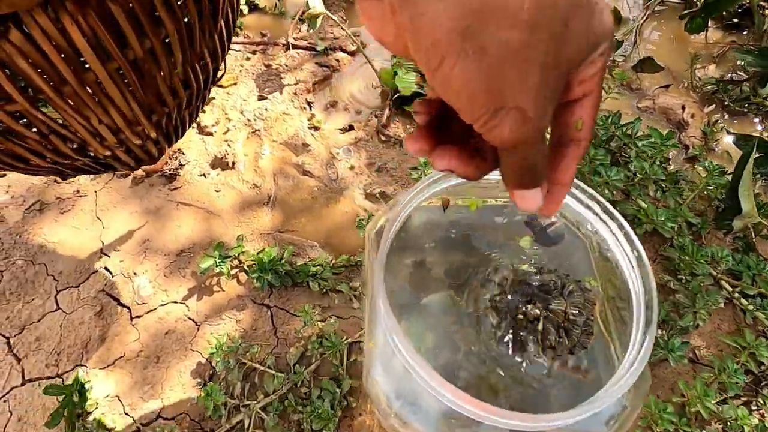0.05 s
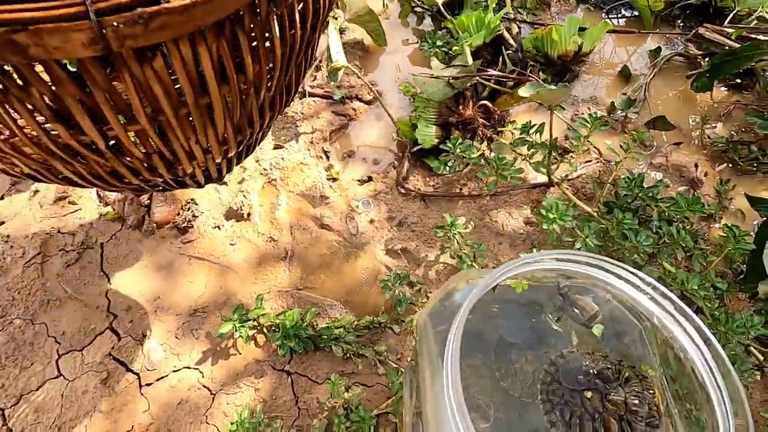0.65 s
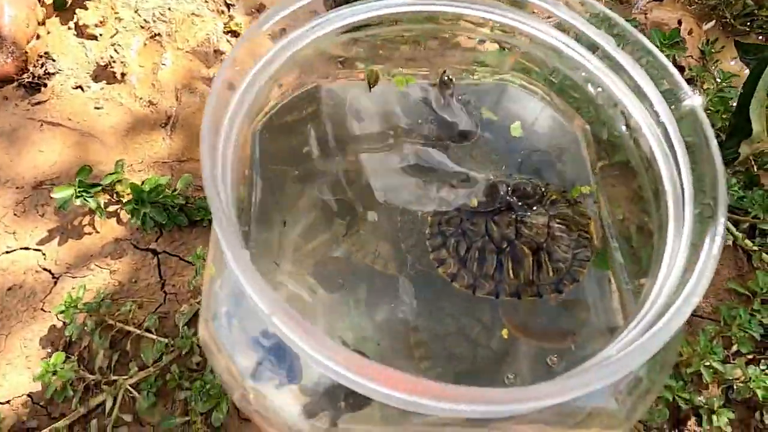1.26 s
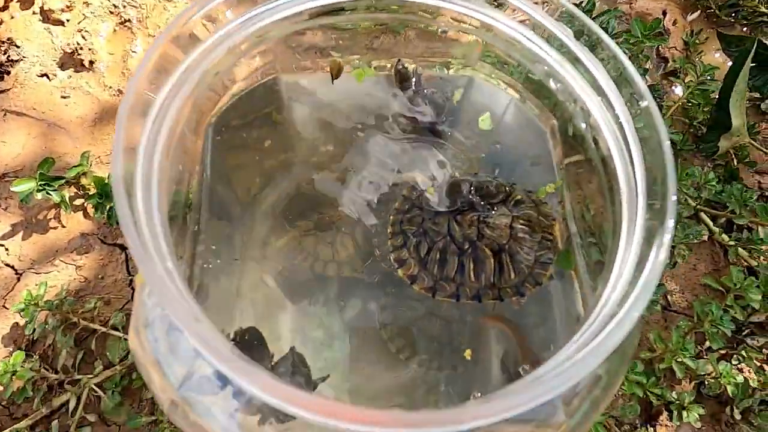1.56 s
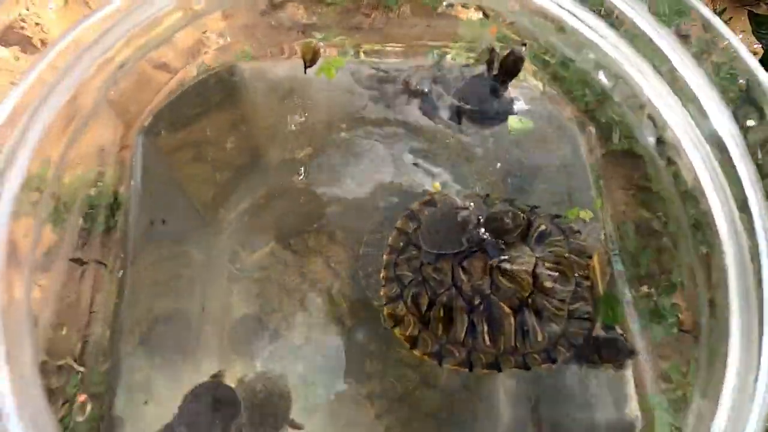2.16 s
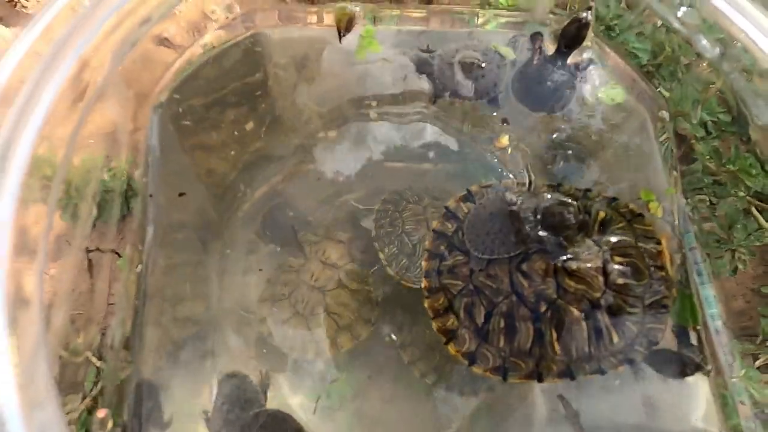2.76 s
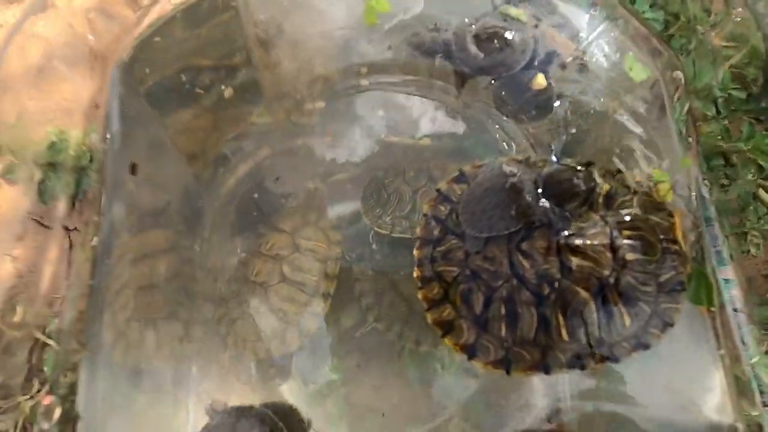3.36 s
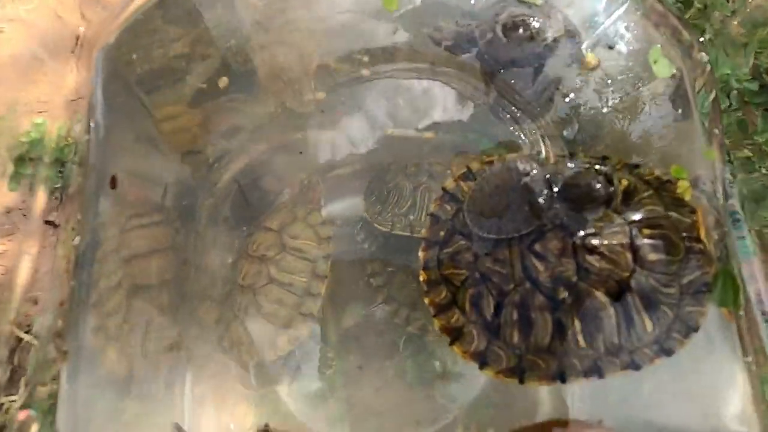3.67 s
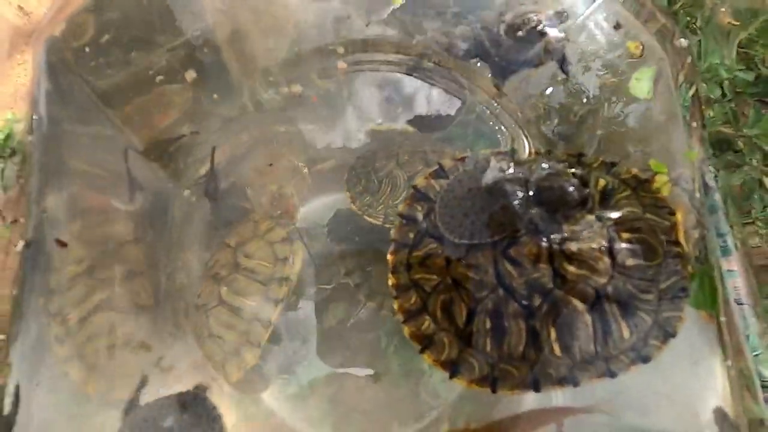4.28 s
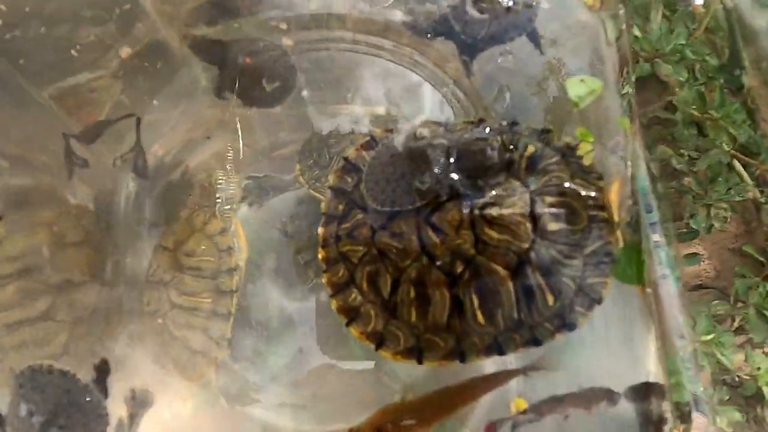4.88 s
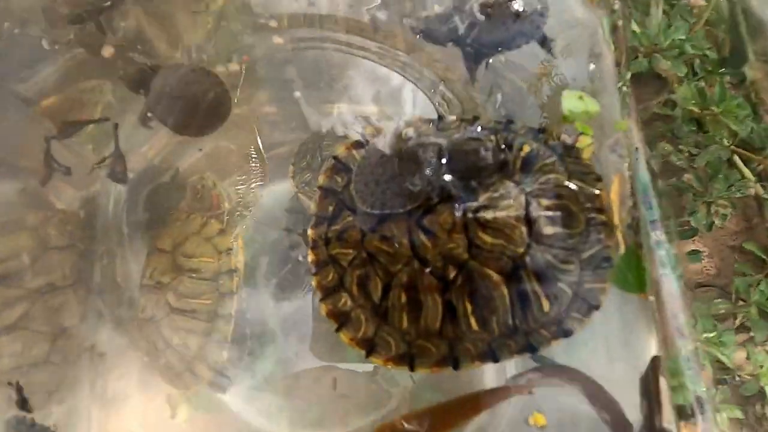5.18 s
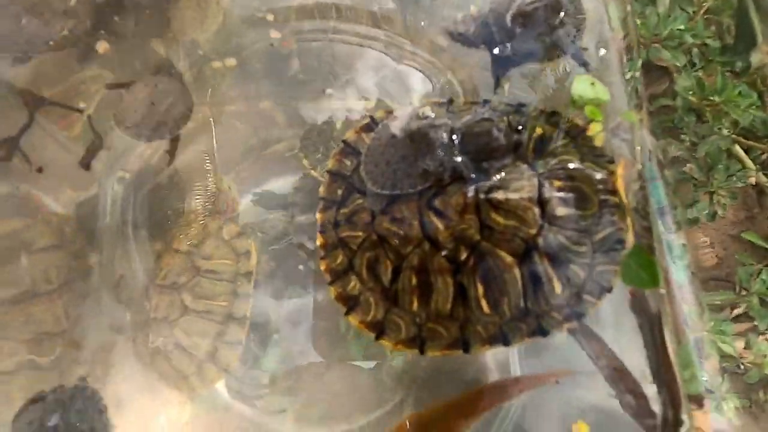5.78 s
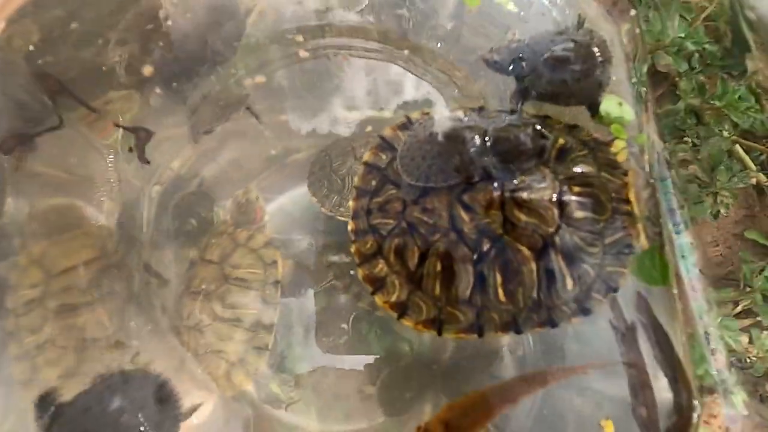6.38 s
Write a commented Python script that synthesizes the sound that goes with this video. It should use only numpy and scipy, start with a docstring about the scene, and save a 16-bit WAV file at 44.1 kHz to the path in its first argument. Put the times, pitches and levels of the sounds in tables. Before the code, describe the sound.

A plastic tub of water with small turtles in it is heard close up outdoors, over a faint hush and light wind on the microphone. In the first 1.3 seconds there are several soft thuds on the ground, with a sharp plastic snap at 0.7. A hand brushes faintly past until about 2 seconds. Shells knock hollowly and scrape against the tub at irregular intervals throughout, softly at first, with a stronger bump at 2.6 and a loud snap at 2.9. From there to 3.6 come small splashes, fine bubbling and bright, sharp ticks. Around 4.2 there is a plop and another little splash among more knocks, while the wind rumble swells slightly. Tiny squeaks and drips follow between 5.1 and 5.4. From 5.6 to the end at 6.5, a short scrape, more bumps and crisp ticks sound.

```python
"""Small turtles bump and scrape their shells against a plastic tub of water on the ground outdoors.
Each impact excites the damped modes of wall, sides and floor; paddling flicks up splashes and traps air,
which rings as bubbles. Drips, plops and short squeaks glide in pitch. Plastic snaps and ticks, the ground
thuds, and a hand rubs the rim and rustles close by. Turbulence of a light wind rumbles on the
microphone ports over a faint hush."""
import sys
import numpy as np
from scipy import signal
from scipy.fft import rfft, irfft, next_fast_len
from scipy.io import wavfile
from scipy.ndimage import uniform_filter1d, map_coordinates

SR = 44100
rng = np.random.default_rng(int(sys.argv[2]) if len(sys.argv) > 2 else 0)


def unload_wav(signal):
    """Save mono or channel-first audio to the path in sys.argv[1] as 16-bit WAV at rate SR, clipped to [-1, 1]."""
    wavfile.write(
        sys.argv[1],
        SR,
        np.round(np.clip(np.atleast_2d(signal).T, -1, 1) * 32767).astype(np.int16),
    )


N = 287973

# modes of the water-loaded tub: f/Hz, level/dB, T60/s
TUB_MODES = [(210.2, -7.5, 0.18), (240, -6.5, 0.097), (308.6, -6, 0.098), (452.5, -4.5, 0.12),
             (511, -5.5, 0.12), (571.4, -1.5, 0.1), (628, -0.5, 0.071), (697.8, 3, 0.058), (757, -1, 0.06),
             (883, -15.5, 0.026), (1487, 2, 0.045), (1537, -4, 0.014), (2530, -13, 0.017),
             (2830, -8.5, 0.026), (3850, -15.5, 0.019)]
# excitation of the tub by claws and moving water: t/s, level/dB
STIR_LEVEL = [(0.0, -45.5), (0.24, -66.5), (1.03, -69.5), (2.29, -68), (2.73, -54.5), (3.35, -58.5),
              (4.11, -47.5), (5.07, -53.5), (5.64, -58.5), (5.82, -49.5), (6.53, -51.5)]
# flicks of water: t/s, duration/s, rms level/dB
FLICKS = [(2.871, 0.035, -44), (2.967, 0.058, -49), (3.331, 0.03, -34.5), (3.362, 0.042, -38),
          (3.446, 0.024, -41.5), (3.471, .03, -34), (4.162, 0.017, -51), (4.208, 0.032, -41),
          (4.244, 0.068, -48), (5.998, 0.062, -51.5)]
# spectra of low rumble, fine crackle and spray: f/Hz, level/dB
RUMBLE_SPECTRUM = [(40, -0.5), (80, 1.5), (125, 1.5), (160, -4.5), (220, -17.5), (400, -32), (900, -60)]
CRACKLE_SPECTRUM = [(500, -50), (1000, -2), (1800, -1.5), (3100, -1.5), (4500, -2.5), (6500, -4.5),
                    (8200, -10.5), (10000, -11), (13500, -32), (15500, -43)]
SPRAY_SPECTRUM = [(400, -8), (800, -14), (1660, 1.5), (2400, -2.5), (3400, 0), (4800, -0.5), (6500, -1.5),
                  (8000, -12), (10000, -14), (13000, -27), (15500, -46)]


def amp(db):
    """Amplitude ratio of a level in decibels."""
    return 10 ** (np.asarray(db) / 20)


def unit(x):
    """Normalisation to rms 1."""
    return x / np.sqrt(np.mean(x ** 2) + 1e-20)


def peaked(x):
    """Normalisation to peak 1."""
    return x / (np.abs(x).max() + 1e-12)


def seconds(length):
    """Uniformly sampled time axis."""
    return np.arange(int(length * SR)) / SR


def curve(points):
    """Linear interpolation of (t/s, value) points over the scene."""
    return np.interp(np.arange(N) / SR, *np.transpose(points))


def wobble(rate):
    """Smooth random modulation: a spline through rate Gaussian knots a second."""
    return map_coordinates(rng.standard_normal(int(N * rate / SR) + 4), [np.arange(N) * rate / SR])


def chance(per_s):
    """Poisson process: sample positions of events at a steady or changing rate."""
    return np.flatnonzero(rng.random(N) < per_s / SR)


def filtered(x, response):
    """Linear filtering: the spectrum of x times a frequency response."""
    n = x.shape[-1]
    m = next_fast_len(2 * n)
    return irfft(rfft(x, m) * response(np.fft.rfftfreq(m, 1 / SR)), m)[..., :n]


def coloured(x, points):
    """Spectral shaping by (f/Hz, level/dB) points, to rms 1."""
    f, db = np.transpose(points)
    return unit(filtered(x, lambda hz: amp(np.interp(np.log(hz + 1), np.log(f), db))))


def patchy(x, depth_db):
    """Time-frequency modulation: every few milliseconds other narrow bands stand out."""
    spectra = signal.stft(x, nperseg=256)[2]
    field = uniform_filter1d(rng.standard_normal(spectra.shape[-2:]), 5, axis=0)
    field = uniform_filter1d(field, 2, axis=1)
    return signal.istft(spectra * amp(depth_db * unit(field)), nperseg=256)[1][..., :x.shape[-1]]


def pair(n, correlation):
    """Partially coherent white noise at two microphones."""
    common, opposed = rng.standard_normal((2, n))
    angle = np.arccos(np.clip(correlation, -1, 1)) / 2
    return np.cos(angle) * common + np.sin(angle) * np.array([opposed, -opposed])


def placed(x, left_db, lag_ms):
    """Direction cues: level difference and delay of the left microphone against the right."""
    side = np.array([[.5], [-.5]])
    return filtered(x, lambda hz: amp(side * left_db) * np.exp(-2j * np.pi * hz * side * lag_ms / 1000))


def add(track, s, sound):
    """Superposition of a sound on the track from time s."""
    part = track[..., max(round(s * SR), 0):][..., :sound.shape[-1]]
    part += sound[..., :part.shape[-1]]


def ring(modes, t, rise_cycles, scatter_db, detune):
    """Damped free vibration, a row per mode; each blow lands elsewhere, and low modes build slowly."""
    hz, db, t60 = np.transpose(modes)[:, :, None]
    size, pitch, phase = rng.standard_normal((3, len(modes), 1))
    swell = 1 - np.exp(-t * hz / rise_cycles)
    tone = np.sin(2 * np.pi * (hz * (1 + detune * pitch) * t + phase))
    return amp(db + scatter_db * size - 60 * t / t60) * swell * tone


def wind():
    """Turbulent pressure buffets each port unevenly; a rumble weakly follows it, over a steady hush."""
    # wind strength: t/s, level/dB
    strength = [(0, -48), (.33, -44.5), (.8, -57), (1.14, -42.5), (1.45, -54.5), (2.2, -49.5), (2.7, -43.5),
                (3.45, -37.5), (3.6, -32.5), (3.92, -37), (4.1, -33.5), (4.33, -45.5), (4.46, -34.5),
                (4.66, -32), (4.98, -65), (5.75, -52), (6.15, -38), (6.43, -41), (6.53, -80)]
    # spectra of the eddies and of the outdoor hush: f/Hz, level/dB
    eddy_spectrum = [(11, -19), (18, -15), (44, 0), (110, -21.5), (140, -53), (240, -120)]
    hush_spectrum = [(100, -42), (170, 0.5), (348, -9), (675, -4), (948, -22), (1490, -10.5), (1940, -27.5),
                     (3000, -22.5), (8470, -34.5), (12100, -51), (15500, -64)]
    strength_db = curve(strength)
    eddies, gusts = pair(N, correlation=.05), pair(N, correlation=.62)
    buffet = amp(strength_db + 2 * wobble(15)) * coloured(eddies, eddy_spectrum)
    rumble_db = -44 + .22 * (strength_db - strength_db.mean()) + 1.84 * wobble(15)
    rumble = amp(rumble_db) * coloured(gusts, RUMBLE_SPECTRUM)
    hush = amp(-59.5) * coloured(pair(N, correlation=.75), hush_spectrum)
    return buffet + rumble + hush


def ground_thuds():
    """Heavily damped impacts on dry ground: a short boom, a low push of air and a scuff of dust."""
    # soft blows: t/s, level/dB
    blows = [(0.312, -31), (0.707, -22.5), (0.894, -31.5), (1.096, -32.5), (1.126, -33), (1.212, -41),
             (1.272, -35), (5.662, -34)]
    # modes of the ground: f/Hz, level/dB, T60/s
    ground_modes = [(180.4, 10, 0.054), (234, 8, 0.088), (293, -1, 0.016), (398, -1, 0.046),
                    (880, -19, 0.0052)]
    # spectrum of scuffed dust: f/Hz, level/dB
    dust_spectrum = [(100, 9), (300, 2), (1000, -1.5), (4000, -36)]
    out, t = np.zeros(N), seconds(.2)
    for s, db in blows:
        boom = peaked(ring(ground_modes, t, rise_cycles=1, scatter_db=4.5, detune=.037).sum(0))
        push = peaked(np.sin(2 * np.pi * 105 * t) * amp(-60 * t / .036))
        scuff = peaked(coloured(rng.standard_normal(len(t)), dust_spectrum) * amp(-60 * t / .061))
        add(out, s, amp(db - 4) * (boom + amp(-2.5) * push + amp(-5) * scuff))
    return placed(out, left_db=-6, lag_ms=.059)


def sliding_hand():
    """Friction noise: skin brushes past the microphone with a bright, grainy hiss."""
    # course of the stroke: t/s, level/dB
    stroke = [(1.238, -100), (1.247, -48), (1.28, -65.5), (1.42, -66.5), (1.55, -58), (1.65, -62),
              (1.76, -58), (1.88, -70), (2.0, -100)]
    # spectrum of rubbing skin: f/Hz, level/dB
    skin_spectrum = [(1500, -8.5), (3500, -4.5), (6000, -4.5), (8200, -11.5), (10000, -12.5), (13500, -24),
                     (15500, -31)]
    friction = pair(N, correlation=.17) * amp(1.8 * wobble(710) + 3.3 * wobble(50.6))
    return amp(curve(stroke)) * coloured(friction, skin_spectrum)


def rim_rub():
    """Friction-excited vibration: fingers slip off the rim at the start, and it sings faintly."""
    out, t = np.zeros(N), seconds(.19)
    hz = 950 * (1 + .0097 * wobble(82)[:len(t)])
    tone = unit(np.sin(2 * np.pi * np.cumsum(hz) / SR))
    rub = coloured(rng.standard_normal(len(t)), [(250, -3), (550, 5), (900, -6), (1500, -30), (5000, -51)])
    add(out, 0, signal.windows.tukey(len(t), .4) * (amp(-64) * tone + amp(-55.5) * rub))
    return out


def water_unrest():
    """Agitation of the water in dB: paddling and the wash after each flick add in power."""
    # vigour of the paddling: t/s, level/dB
    paddling = [(0.0, -64.5), (1.03, -72.5), (1.6, -62), (2.64, -71.5), (2.87, -67), (3.02, -60),
                (3.31, -57), (3.51, -49.5), (3.76, -66), (4.0, -66), (4.22, -55), (4.44, -63.5),
                (4.65, -67), (5.12, -68), (5.25, -60.5), (5.87, -60.5), (6.53, -65.5)]
    wash_db, rise_s, t60_s = -16.5, .017, .49
    power, t = amp(curve(paddling)) ** 2, seconds(1)
    for s, _, db in FLICKS:
        wash = amp(db + wash_db - 60 * t / t60_s) * (1 - np.exp(-t / rise_s))
        add(power, s, wash ** 2)
    return 10 * np.log10(power)


def spatter(per_s, t60_s, bed_db):
    """Shot-noise envelope: tiny decaying impacts of uneven size over a weak bed."""
    hits = (rng.random(N) < per_s / SR) * amp(-14 * rng.random(N))
    return signal.fftconvolve(hits, amp(-60 * seconds(.03) / t60_s))[:N] + amp(bed_db)


def wet_crackle(unrest_db):
    """Granular noise of scratching claws and lapping water, each speck in its own narrow bands."""
    grain = spatter(per_s=170, t60_s=.018, bed_db=-12) * amp(2 * wobble(30))
    specks = patchy(pair(N, correlation=.3) * grain, depth_db=4.5)
    return placed(amp(unrest_db + 1) * coloured(specks, CRACKLE_SPECTRUM), left_db=2, lag_ms=.052)


def bubble(hz, cycles):
    """Volume resonance of an air pocket: it decays by 1/e in the given cycles, rising a little in pitch."""
    age = seconds(7 * cycles / hz) * hz / cycles
    envelope = (1 - np.exp(-3 * age)) * np.exp(-age)
    return envelope * np.sin(2 * np.pi * cycles * (age + .006 * age ** 2))


def froth(unrest_db):
    """Air entrainment: stirred water releases small bubbles, more and louder as agitation grows."""
    brisk_db, brisk_per_s, doubling_db, most_per_s = -60, 110, 3.5, 400
    out = np.zeros((2, N))
    starts = chance(np.minimum(brisk_per_s * 2 ** ((unrest_db - brisk_db) / doubling_db), most_per_s))
    for i, (pitch, size, life, side) in zip(starts, rng.standard_normal((len(starts), 4))):
        hz = np.clip(3300 * np.exp(.45 * pitch), 1100, 9000)
        pan_db = np.array([[1.5], [-1.5]]) * side
        gain = amp(unrest_db[i] + 4.5 + 4 * min(size, 2) + pan_db)
        add(out, i / SR, gain * bubble(hz, cycles=7.5 * np.exp(.45 * life)))
    return placed(out, left_db=16, lag_ms=.054)


def drips_and_squeaks():
    """Frequency glides: drips, plops and short squeaks are brief gliding tones with a little hiss."""
    # drips, plops and short squeaks: t/s, level/dB, f/Hz, glide/(octaves per s)
    chirps = [(0.332, -40, 1650, -16.5), (2.889, -29.5, 4160, -4), (3.038, -47, 6370, 72),
              (3.645, -39, 2960, 17), (3.738, -41.5, 6590, 9), (4.175, -25, 605, 2.5),
              (4.325, -41.5, 3750, 8.5), (5.14, -38, 3250, 8.5), (5.189, -36, 2156, -7),
              (5.248, -45, 4230, 9), (5.263, -44.5, 2240, -5), (5.353, -37.5, 4370, -16.5),
              (5.392, -37, 2840, -1), (5.409, -28, 2940, -1.5), (5.406, -27.5, 1515, 1),
              (5.417, -36.5, 1010, -20.5)]
    out, t = np.zeros(N), seconds(.059)
    for s, db, hz, glide in chirps:
        swell_s = .0079 * (1000 / hz) ** .34  # higher tones are quicker
        envelope = peaked(t ** 2 * np.exp(-2 * t / swell_s))
        tone = np.sin(2 * np.pi * np.cumsum(hz * 2 ** np.clip(glide * t, -1, 1)) / SR)
        band = [(hz / 3, -25), (hz, 0), (hz * 1.42, -16), (hz * 7, -55)]
        hiss = coloured(rng.standard_normal(len(t)), band)
        add(out, s, amp(db) * envelope * (.41 * tone + .46 * hiss))
    return placed(out, left_db=3.5, lag_ms=.026)


def splashes():
    """Surface break-up: a flicking foot tears the water into spurts, each at its own pitch, over mist."""
    spurts_per_s, t60_s, low_hz, high_hz = 190, .024, 1700, 10000
    out, t = np.zeros((2, N)), seconds(.017)
    for s, length, db in FLICKS:
        progress = seconds(length) / length
        spurts = np.zeros((2, len(progress)))
        count = int(length * spurts_per_s) + 1
        for k, (delay, pitch, size) in enumerate(rng.random((count, 3))):
            hz = low_hz * (high_hz / low_hz) ** pitch
            spurt = coloured(pair(len(t), correlation=.5), [(hz / 2, -16), (hz, 0), (hz * 2, -16)])
            add(spurts, (k + delay / 2) / count * length, amp(-10 * size - 60 * t / t60_s) * spurt)
        mist = amp(-2.5) * pair(len(progress), correlation=.28)
        spray = coloured(unit(spurts) + mist, SPRAY_SPECTRUM)
        add(out, s, amp(db) * unit(progress ** .34 * (1 - progress) * spray))
    return placed(out, left_db=6.5, lag_ms=.039)


def ticks(unrest_db):
    """Light impacts of claws and drops on plastic: noise bursts, each with a resonance and a weak tail."""
    # strikes: t/s, peak level/dB, resonance f/Hz, treble boost/dB
    strikes = [(0.042, -43, 3000, -6), (.111, -40, 2700, -11), (0.1384, -33.5, 2970, -2),
               (0.9553, -47, 2940, -2), (1.0864, -41, 3020, -14), (1.527, -33, 5600, 6),
               (1.59, -35.5, 4300, 10), (1.721, -31.5, 2630, -3), (2.079, -38.5, 4200, -13),
               (2.2329, -36.5, 4600, -1), (2.4145, -33.5, 3020, -3), (2.5605, -32.5, 2060, -13),
               (2.5814, -26, 2840, -6), (2.9828, -16, 4500, 15), (3.091, -31.5, 4170, 20),
               (3.111, -25, 3550, -3), (3.249, -23.5, 3420, -12), (3.3346, -16, 5600, -7),
               (3.341, -25, 3660, 1), (3.378, -24.5, 5470, 32), (3.452, -20.5, 2970, 12),
               (3.4592, -16.5, 3914, 0), (3.4642, -11, 4000, 8), (3.477, -19, 4100, -2),
               (3.4825, -16, 2840, 6), (3.5669, -12, 3300, 6), (3.6293, -25.5, 2080, -12),
               (4.067, -28.5, 1890, -9), (4.2035, -26, 4810, 6), (4.215, -28, 4270, 18),
               (4.261, -24, 2270, -29), (4.329, -25, 3840, 8), (4.4917, -35, 3020, -9),
               (5.638, -30.5, 3960, 0.5), (5.7381, -19, 6170, 0), (5.9792, -13.5, 3830, 7),
               (5.999, -29, 3870, 3), (6.029, -29, 3340, 6), (6.157, -26, 4570, -5),
               (6.176, -30.5, 4500, 19), (6.233, -26, 2720, 12), (6.2606, -34, 4280, 6),
               (6.2892, -31.5, 4660, 21)]
    rise_s, t60_s, tail_db, tail_t60_s, half_width_hz = .00072, .015, -27, .26, 360
    out, t = np.zeros((2, N)), seconds(.041)
    envelope = (1 - np.exp(-t / rise_s)) * (amp(-60 * t / t60_s) + amp(tail_db - 60 * t / tail_t60_s))
    faint = [(i / SR, unrest_db[i] + 19.5 + rng.uniform(-5, 5), 3000 * rng.lognormal(0, .2), 0)
             for i in chance(per_s=8)]
    for s, db, centre_hz, treble_db in strikes + faint:
        noise = coloured(patchy(pair(len(t), correlation=.18), depth_db=3.5), SPRAY_SPECTRUM)
        resonance = lambda hz: 1 + 2.9 / (1 + ((hz - centre_hz) / half_width_hz) ** 2)
        shelf = lambda hz: amp(treble_db / (1 + (6000 / (hz + 1)) ** 4))
        tick = filtered(noise, lambda hz: resonance(hz) * shelf(hz))
        add(out, s, amp(db) * peaked(tick * envelope))
    return placed(out, left_db=3.5, lag_ms=.043)


def snaps():
    """Sudden release of strain in stiff plastic: an impulse, a short ring and a rustle as it settles."""
    # snaps: t/s, level/dB, upper modes/dB, damping by the grip/(dB per s), crack re ring/dB
    releases = [(0.6764, -11, -11, 700, 5), (2.9068, -8, 3, 300, -12), (6.337, -26, -13.5, 60, 7)]
    # modes of the stiff plastic: f/Hz, level/dB, T60/s
    plastic_modes = [(645, 1, 0.017), (1220, 7, 0.023), (1450, 2.5, 0.032), (1960, 8, 0.011),
                     (3080, 1.5, 0.02), (3650, 7, 0.02), (4490, 10.5, 0.0023)]
    # two bands of the impulse: lower f/Hz, upper f/Hz
    crack_bands = [(1080, 1720), (2700, 4900)]
    out, t = np.zeros(N), seconds(.06)
    upper = np.transpose(plastic_modes)[0] > 2500
    bandpasses = [signal.butter(3, band, "bandpass", fs=SR, output="sos") for band in crack_bands]
    low, high = [signal.sosfilt(sos, signal.unit_impulse(len(t))) for sos in bandpasses]
    crack = peaked(1.8 * low + high)
    for s, db, upper_db, damping, crack_db in releases:
        modes = ring(plastic_modes, t, rise_cycles=.3, scatter_db=1, detune=.01)
        body = peaked(modes[~upper].sum(0) + amp(upper_db) * modes[upper].sum(0)) * amp(-damping * t)
        rustle = coloured(rng.standard_normal(len(t)), CRACKLE_SPECTRUM) * amp(-24 - 60 * t / .062)
        add(out, s, amp(db) * (peaked(body + amp(crack_db) * crack) + rustle))
    return placed(filtered(out, lambda hz: 1 / (1 + (hz / 8500) ** 4)), left_db=7, lag_ms=.061)


def sloshing(x, depth, per_s):
    """Frequency modulation: sloshing water shifts all resonances by a share of about depth."""
    return map_coordinates(x, [np.arange(N) + depth * SR / per_s * wobble(per_s)], mode="reflect")


def stirring():
    """Forced vibration: claws and moving water keep the tub's modes faintly ringing between bumps."""
    hz, db, t60 = np.transpose(TUB_MODES)
    widths = 1.96 * np.log(1000) / np.pi / t60  # about twice the bandwidth of free decay
    gains = amp(db - 12 * np.maximum(np.log2(hz / 800), 0))
    gains[1::2] *= -1  # neighbouring modes alternate in sign
    body = lambda f: sum(gain * 1j * f * width / (centre ** 2 - f ** 2 + 1j * f * width)
                         for centre, width, gain in zip(hz, widths, gains))
    scratches = pair(N, correlation=1) * amp(9.2 * wobble(45))
    ringing = np.array([sloshing(channel, depth=.05, per_s=7) for channel in filtered(scratches, body)])
    return placed(amp(curve(STIR_LEVEL)) * unit(ringing), left_db=-5.5, lag_ms=.061)


def shell_scrapes():
    """Stick-slip friction: a shell drags along the wet plastic."""
    # drags: t/s, duration/s, level/dB
    drags = [(1.068, 0.065, -56.5), (1.721, 0.066, -52), (2.35, 0.11, -53), (3.099, 0.1, -47),
             (4.049, .25, -44), (4.769, 0.14, -47.5), (5.229, 0.15, -48), (5.727, 0.16, -37),
             (6.015, 0.12, -45.5), (6.319, 0.033, -42)]
    # spectrum of shell on plastic: f/Hz, level/dB
    scrape_spectrum = [(200, 3.5), (420, 5.5), (740, 9.5), (950, -41), (1500, -20), (2400, -10.5),
                       (4000, -24.5), (9000, -39.5)]
    out = np.zeros(N)
    for s, length, db in drags:
        n = len(seconds(length))
        slips = rng.standard_normal(n) * amp(4.5 * wobble(169)[:n])
        scrape = coloured(patchy(slips, depth_db=4), scrape_spectrum)
        add(out, s, amp(db) * signal.windows.tukey(n, .5) * scrape)
    return placed(out, left_db=-2.5, lag_ms=.031)


def shell_bumps():
    """Modal response to shell impacts: the wall ticks, the loaded sides ring hollow, the floor booms."""
    # blows: t/s, peak level of the sides/dB, floor and wall re sides/dB, favoured f/Hz, chatter (0-1)
    blows = [(.111, -37, -32, -14, 647, .34), (.787, -44, -23, -5.5, 750, 0.31),
             (1.06, -38, -31, -6.5, 716, 0.58), (1.27, -42, -4, 1.5, 660, 0.3),
             (1.394, -37.5, -6, -8, 624, 0.44), (1.531, -39, -9, -5, 580, 0.78),
             (1.582, -44, 2.5, -8, 605, 0.81), (1.721, -36, -24, -7, 676, 0.62),
             (2.186, -32.5, -7.5, -6.5, 630, 0.54), (2.281, -34.5, -14, -11, 700, 0.5),
             (2.366, -35.5, -9.5, -11, 720, 0.97), (2.583, -18.5, -10.5, -11.5, 610, 0.33),
             (2.699, -38.5, 1, -9.5, 700, 0.67), (2.881, -26, -10.5, -8, 813, 0.54),
             (3.097, -34, -3, -14, 740, .9), (3.237, -22.5, -12, -15, 705, 0.15),
             (3.333, -25, -27, -3, 650, .46), (3.4, -27.5, -8.5, -10, 460, 0.52),
             (3.563, -32, -7, -16, 635, 0.65), (3.616, -33.5, -12, -18.5, 580, .56),
             (3.941, -23, -8, -9.5, 630, 0.79), (4.018, -31, -28, -17, 689, .7),
             (4.11, -24, -11, -8.5, 660, 0.35), (4.264, -26, -8.5, -3.5, 540, 0.47),
             (4.385, -30.5, -8, -4, 760, 1), (4.585, -30, -15.5, -5.5, 570, .57),
             (4.761, -37, -13, -5.5, 700, 1), (4.912, -38.5, -15, 1.5, 666, 0.32),
             (4.934, -28, -5, -8.5, 567, 0.38), (5.642, -34.5, 1, -1.5, 594, 1),
             (5.738, -30.5, -9.5, -10, 700, 0.65), (5.803, -24.5, -5.5, -15, 682, 0.32),
             (5.845, -31.5, 1, -15, 640, .46), (5.968, -36, -6, -2, 688, 1),
             (6.337, -25.5, -2.5, -4.5, 510, 0.54), (6.434, -29.5, -14, -14, 593, 0.55)]
    # spectrum of the scratch at contact: f/Hz, level/dB
    grit_spectrum = [(400, 1), (1300, 8.5), (2200, -6), (4000, -3.5), (9000, -42)]
    slip_rise_s, slip_t60_s, focus_db, focus_width_hz = .01, .22, 5.5, 96
    side_lag_s, floor_lag_s = .00088, .00484  # lower modes answer later
    out, t = np.zeros(N), seconds(.3)
    hz = np.transpose(TUB_MODES)[0]
    floor, wall = hz < 400, hz > 1100
    stir_db = curve(STIR_LEVEL)
    nudges = [(i / SR, stir_db[i] + 12 + rng.uniform(-4, 4), -3.5, -9, rng.uniform(500, 780), .7)
              for i in chance(per_s=2.5)]
    for s, db, floor_db, wall_db, focus_hz, drag in blows + nudges:
        # the shell drags on after the blow in a fading chatter of slips
        slips = rng.standard_normal(len(t)) ** 3
        slips *= amp(-60 * t / slip_t60_s) * (1 - np.exp(-t / slip_rise_s))
        modes = ring(TUB_MODES, t, rise_cycles=.35, scatter_db=2.5, detune=.03)
        # the thin wall rings differently at every spot
        modes[wall] = ring(np.array(TUB_MODES)[wall], t, rise_cycles=1, scatter_db=4, detune=.05)
        # the place of the blow favours the modes around one frequency
        modes *= amp(focus_db * np.exp(-((hz[:, None] - focus_hz) / focus_width_hz) ** 2))
        chatter = signal.fftconvolve(modes, slips[None] / np.linalg.norm(slips), axes=1)[:, :len(t)]
        soft, hard = modes + drag * chatter, modes + .25 * drag * chatter
        grit = peaked(coloured(rng.standard_normal(len(t)), grit_spectrum) * amp(-60 * t / .079))
        shove = peaked(coloured(rng.standard_normal(len(t)), RUMBLE_SPECTRUM) * t * amp(-60 * t / .21))
        add(out, s, amp(db) * (amp(wall_db) * peaked(hard[wall].sum(0)) + amp(-15.5) * grit))
        add(out, s + side_lag_s, amp(db) * peaked(soft[~floor & ~wall].sum(0)))
        add(out, s + floor_lag_s, amp(db + floor_db) * (peaked(soft[floor].sum(0)) + amp(-4) * shove))
    return placed(out, left_db=-4.5, lag_ms=.028)


def scene():
    """Superposition of the tub, its water, the hand, the ground and the open air."""
    unrest_db = water_unrest()
    tub = shell_bumps() + shell_scrapes() + stirring() + snaps() + ticks(unrest_db) + rim_rub()
    small_sounds = splashes() + froth(unrest_db) + drips_and_squeaks() + wet_crackle(unrest_db)
    return tub + small_sounds + sliding_hand() + ground_thuds() + wind()


def record(dry):
    """Band limiting: an ideal low-pass at 15.8 kHz."""
    return filtered(dry, lambda hz: hz < 15800)


dry = scene()
out = record(dry)
unload_wav(out)
```